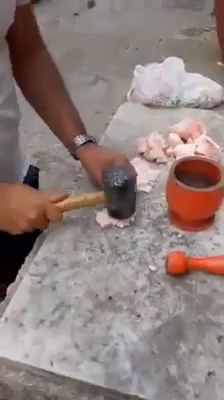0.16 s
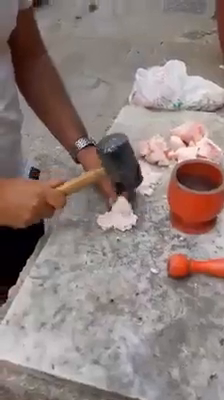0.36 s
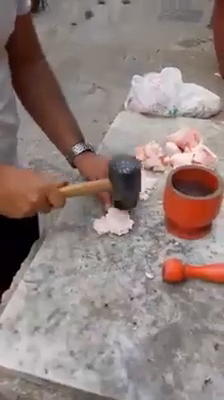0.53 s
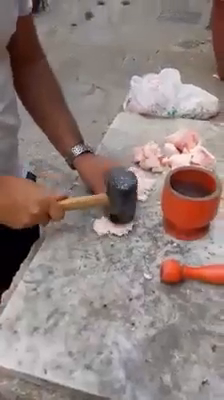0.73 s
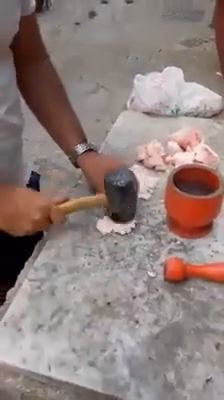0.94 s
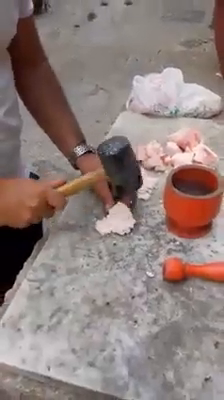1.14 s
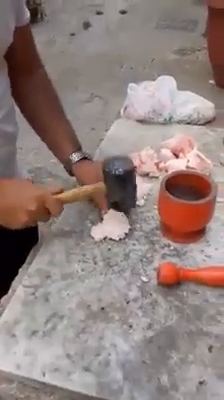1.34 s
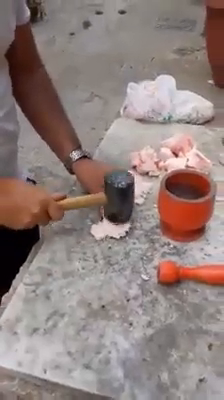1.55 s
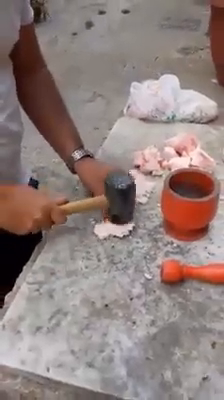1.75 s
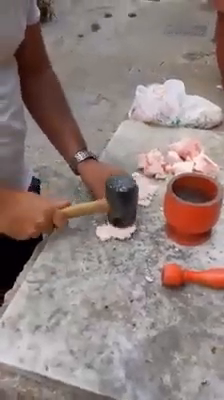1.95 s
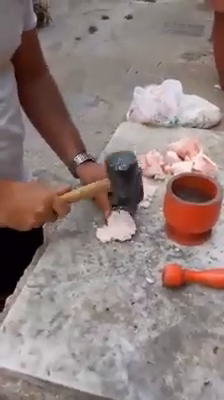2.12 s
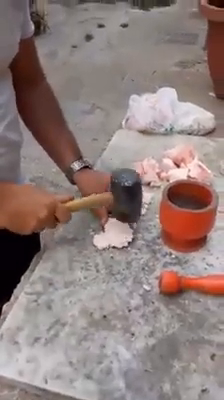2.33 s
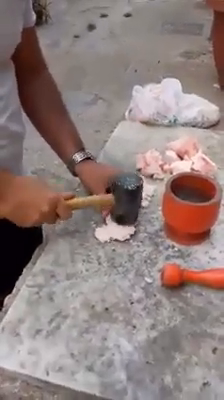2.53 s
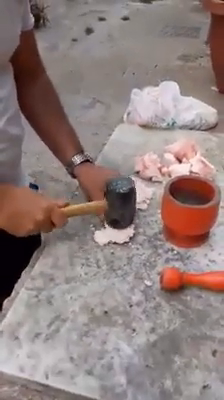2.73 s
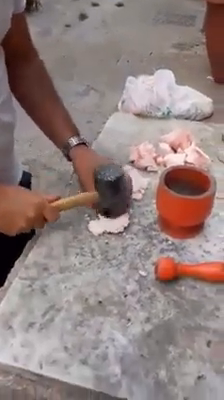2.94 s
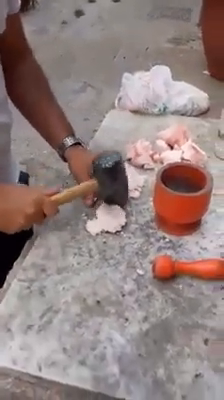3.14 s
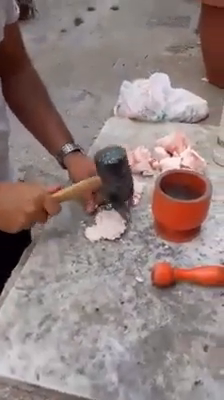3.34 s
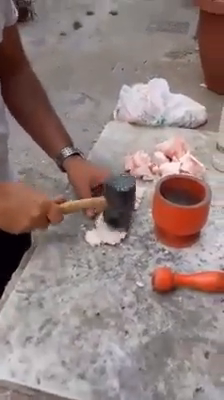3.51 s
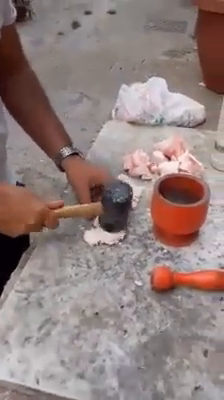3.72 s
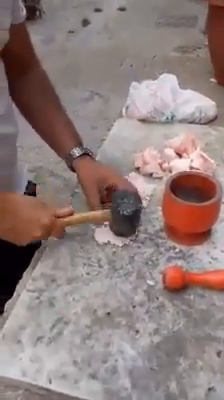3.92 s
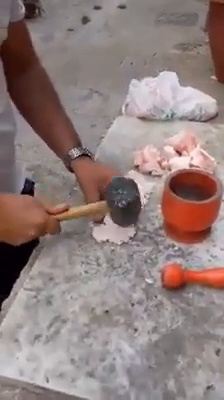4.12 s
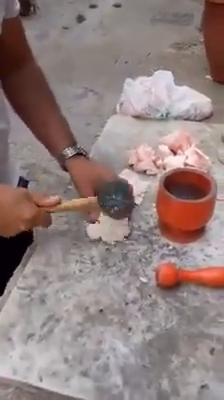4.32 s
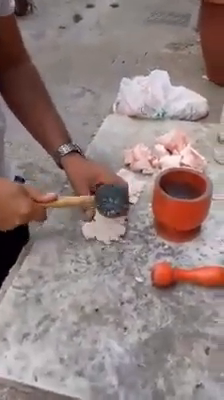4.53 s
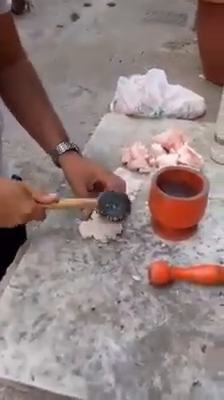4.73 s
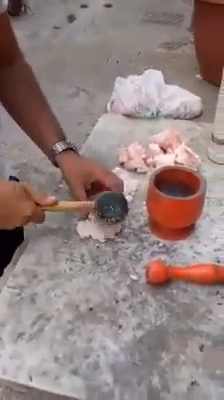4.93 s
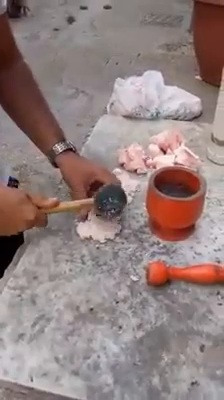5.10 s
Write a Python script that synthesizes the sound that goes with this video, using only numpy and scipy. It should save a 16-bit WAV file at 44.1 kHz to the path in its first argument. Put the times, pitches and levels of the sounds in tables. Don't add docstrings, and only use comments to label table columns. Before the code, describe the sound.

Close outdoor take of a rubber mallet striking frozen fat on a stone slab, roughly four even blows a second. Each has a short brittle crack, a hollow low-mid thud and a softer double bounce with a wet slap. Blows get heavier towards the middle, then suddenly weaken after four seconds to light taps. Crumbs hiss and tick between; a short dark yard echo follows, over very quiet air.

```python
import sys
import numpy as np
from scipy import signal
from scipy.fft import rfft, irfft
from scipy.io import wavfile
from scipy.ndimage import uniform_filter1d

SR = 44100
rng = np.random.default_rng(int(sys.argv[2]) if len(sys.argv) > 2 else 0)


def unload_wav(signal):
    wavfile.write(
        sys.argv[1],
        SR,
        np.round(np.clip(np.atleast_2d(signal).T, -1, 1) * 32767).astype(np.int16),
    )


def rack_gain(trim_db):
    fader = np.asarray(trim_db, float)
    return 10 ** (fader / 20)


N = 232318

# start_s, peak_db, tilt_db_per_octave, length_s, settling_hiss_db
SHATTERS = [(0.2545, -19, 0.1, 0.0052, -57), (0.519, -16.5, 0.5, 0.0061, -55.5),
            (0.7824, -18.5, 2, 0.0081, -55.5), (1.044, -12.5, -3, 0.0074, -51),
            (1.3075, -11, -4, 0.0066, -52), (1.5694, -16, 2, 0.0065, -56),
            (1.8135, -14, -1.5, 0.0077, -54.5), (2.065, -9.5, -0.3, 0.0064, -50),
            (2.3141, -13, -4, 0.0081, -50.5), (2.5553, -17, -4.5, 0.0094, -52.5),
            (2.7923, -15, -5, 0.0074, -54.5), (3.025, -19, -2.5, 0.0067, -55),
            (3.277, -11.5, 1.5, 0.0086, -50.5), (3.522, -17.5, -4, 0.0087, -55.5),
            (3.757, -19.5, -1.5, 0.011, -54), (4.015, -22, -2.5, 0.011, -56),
            (4.259, -23, -1.6, 0.0094, -57.5), (4.503, -25, -5.5, 0.0094, -65.5),
            (4.736, -24, -3.5, 0.0077, -64.5), (4.9752, -19, 1.5, 0.0058, -62.5),
            (5.214, -12.5, 4.5, 0.0085, -56.5)]
# pitch_hz, level_db_per_hz
BRITTLE = [(900, -40), (2100, -3), (3200, -14), (4400, -3.5), (5000, -8.5), (6750, -10), (8300, -2.5),
           (9700, -4), (10600, -16.5), (11300, -14), (12000, -4), (14000, -15), (15600, -29),
           (16200, -72.5)]


def evened(x):
    return x / np.sqrt(np.mean(x ** 2) + 1e-20)


def read(points, hz):
    f, value = np.transpose(points)
    return np.interp(np.log(hz + 1), np.log(f + 1), value)


def add(mix, s, sound):
    part = mix[round(s * SR):][:len(sound)]
    part += sound[:len(part)]


def coloured(x, spectrum):
    gain = rack_gain(read(spectrum, np.fft.rfftfreq(len(x), 1 / SR)))
    return evened(irfft(rfft(x) * gain, len(x)))


def still_air():
    # pitch_hz, level_db_per_hz
    air_colour = [(15, -28), (25, -9.5), (34, 1), (64, -15.5), (195, -1), (255, -9), (465, 1), (620, -8),
                  (1400, -13), (2050, -14), (2410, -21.5), (3520, -25.5), (5280, -34.5), (10700, -28),
                  (12500, -25.5), (14400, -30.5), (16000, -50)]
    now = np.arange(N) / SR
    swell_db = np.interp(now, [.05, .2, .4, 4.6, 5.1], [-5.0, -1.5, 3.0, 6.5, -4.0])
    return rack_gain(-62.5 + swell_db) * coloured(rng.standard_normal(N), air_colour)


def crumbs():
    # start_s, peak_db
    ticks = [
        (0.2109, -66),
        (0.3387, -49.5),
        (1.8836, -59),
        (1.9294, -54),
        (1.993, -50),
        (2.2333, -58),
        (2.4892, -53),
        (2.52, -44.5),
        (3.673, -52),
        (3.73, -63),
    ]
    # pitch_hz, level_db_per_hz
    grit_colour = [(2000, -20), (2800, -2), (3700, -1), (4100, 1.5), (4500, -14.5), (7700, -11.5),
                   (8300, -7.5), (9800, -7.5), (10400, -23.5), (11300, -29.5), (11700, -8.5), (13000, -15),
                   (15400, -35), (15800, -62)]
    # middle_s, length_s, level_db
    strokes = [(0.93, 0.14, -68.5), (1.222, 0.29, -84), (1.79, 0.044, -78), (1.982, 0.11, -58),
               (2.25, .06, -68), (2.52, 0.093, -62.5), (3.208, 0.059, -70), (3.672, 0.22, -64),
               (3.964, 0.072, -70), (4.19, 0.21, -63.5), (4.484, 0.075, -58.5), (4.547, 0.084, -53),
               (5.168, 0.069, -74.5)]
    # pitch_hz, level_db_per_hz
    rub_colour = [(2000, -18.5), (3500, -6.5), (4800, -6.5), (6800, -15.5), (8800, -7), (10700, -16),
                  (12200, -9), (15600, -31)]
    wait_s, fade_db_per_s = .028, 98

    now, rub_power = np.arange(N) / SR, np.zeros(N)
    starts, settle_db = np.array(SHATTERS)[:, [0, 4]].T
    last = np.searchsorted(starts, now) - 1
    since = now - starts[last] - wait_s
    settling = (last >= 0) * (since > 0) * rack_gain(settle_db[last] - fade_db_per_s * since)
    for middle, length, db in strokes:
        rub_power += rack_gain(db) ** 2 * np.exp(-abs(2 * (now - middle) / length) ** 3.0)

    grains = rack_gain(2.7 * rng.exponential(1, (2, N))) * rng.standard_normal((2, N))
    out = uniform_filter1d(settling, size=900) * coloured(grains[0], grit_colour)
    out += np.sqrt(rub_power) * coloured(grains[1], rub_colour)
    t = np.arange(1024) / SR
    for s, db in ticks:
        tick = coloured(rng.standard_normal(1024), BRITTLE) * np.exp(-t / 0.0044)
        add(out, s, rack_gain(db - 1.0) * tick)
    return out


def yard():
    # delay_s, level_db
    echo_taps = [
        (.006, -18),
        (.011, -20.5),
        (.018, -19),
    ]
    # pitch_hz, t60_s
    decay = [(100, 0.47), (230, 0.36), (330, 0.52), (500, 0.33), (1000, 0.46), (2000, 0.36), (4000, 1),
             (9000, 1)]
    wall_hz, tail_db, tail_start_s = 2220, -6, .012

    taps, near = np.zeros(SR), np.zeros(SR)
    at = np.arange(0, SR - 20, 20) + rng.integers(0, 20, SR // 20 - 1)
    taps[at] = rng.choice([-1., 1.], at.shape)
    hz, t, z = signal.stft(taps, SR, nperseg=256)
    fading = z * rack_gain(-60 * t / read(decay, hz)[:, None])
    tail = signal.istft(fading, SR, nperseg=256)[1][:SR]
    add(near, tail_start_s, rack_gain(tail_db) * tail / np.linalg.norm(tail))
    for delay, db in echo_taps:
        add(near, delay, rack_gain(db) * np.ones(1))
    return signal.lfilter(*signal.butter(3, wall_hz, fs=SR), near)


def crunch(db, tilt_db, length):
    t = np.arange(2048) / SR
    rise = np.minimum(t / 0.005, 1) ** 1.58
    crush = rise * (np.exp(-(t / length) ** 3.0) + 0.14 * np.exp(-t / 0.011))
    colour = [(hz, level + tilt_db * np.log2(hz / 7000)) for hz, level in BRITTLE]
    return rack_gain(db - 8.0) * crush * coloured(rng.standard_normal(2048), colour)


def slap(db):
    # pitch_hz, level_db_per_hz
    slap_colour = [(700, -31.5), (1300, -5), (2000, 0.5), (2600, -6.5), (3000, -24.5), (3700, -12.5),
                   (4200, -44.5), (8000, -45.5)]
    rise_s, fall_s = 0.0017, 0.024
    t = np.arange(4096) / SR
    squeeze = (1 - np.exp(-t / rise_s)) * np.exp(-(t / fall_s) ** 1.9)
    return rack_gain(db - 14.5) * squeeze * coloured(rng.standard_normal(4096), slap_colour)


def ring(modes, push, shift_db, rise, scale=1):
    t = np.arange(6000) / SR
    body = np.zeros(6000)
    for (hz, db, t60), shift in zip(modes, shift_db):
        body += rack_gain(db + shift - 60 * t / t60) * np.sin(2 * np.pi * hz * scale * t)
    out = signal.fftconvolve(body * (1 - np.exp(-t / rise)), push)
    return out / abs(out).max()


def slips(give):
    t = np.arange(1800) / SR
    jerks, stroke = rng.standard_normal(1800), t / give * np.exp(-t / give)
    for _ in range(4):
        z = rfft(jerks * stroke)
        flat = irfft(z / (abs(z) + 1e-12))
        jerks = np.clip(evened(flat / (stroke + .05)), -3, 3)
    return jerks * stroke


def landing(thud_db, boom_db, knock_db, thud_hz, tilt_db, give):
    # pitch_factor, level_db, t60_s
    thud_modes = [
        (.69, -12, 0.05),
        (.83, -14, 0.073),
        (1.001, 3, 0.062),
        (1.17, -16, 0.2),
    ]
    # pitch_hz, level_db, t60_s
    boom_modes = [
        (78, -13, 0.28),
        (133, -7.5, 0.31),
        (167, 2, .07),
        (193.6, 15.5, 0.069),
        (246.3, 6, 0.15),
    ]
    # pitch_hz, level_db, t60_s
    knock_modes = [(693, -0.5, 0.075), (847.3, 12, 0.019), (1023, 2, 0.012), (985, 13.5, 0.018),
                   (1208.5, 14, 0.017), (1438, 7, 0.024), (1669, 4, 0.023), (1776, -5.5, 0.012),
                   (1874, 10, 0.011), (2167, -2.5, 0.022), (2150, -25, 0.0085), (2790, -21.5, 0.0054),
                   (3930, -30.5, 0.0087)]

    shift_db = 1.34 * rng.standard_normal((3, len(knock_modes)))
    t = np.arange(1800) / SR
    soft = np.exp(-((t - .001) / 0.00065) ** 2)
    body = rack_gain(thud_db + 2.3) * ring(thud_modes, soft, shift_db[0], 0.014, thud_hz)
    body += rack_gain(boom_db + 3.0) * ring(boom_modes, soft, shift_db[1], 0.013)
    spot = 1 + 0.031 * shift_db[1, -1]
    bright_db = shift_db[2] + tilt_db * np.log2(np.array(knock_modes)[:, 0] / 1200)
    return body + rack_gain(knock_db + 6.5) * ring(knock_modes, slips(give), bright_db, 0.00099, spot)


def mallet():
    # start_s, thud_db, boom_db, knock_db, knock_tilt_db_per_octave
    blows = [(0.255, -17.5, -27.5, -19, -1.5), (0.517, -21, -25.5, -20.5, 12.5),
             (0.784, -10.5, -21, -17.5, 1.5), (1.044, -10.5, -22, -15, -2.5), (1.308, -14, -23.5, -20, -1),
             (1.57, -15.5, -23, -18, 6), (1.815, -15.5, -23, -15.5, 4.5), (2.064, -9.5, -21, -11.5, 8),
             (2.315, -9, -23, -11, 5.5), (2.562, -5.5, -22.5, -12.5, -4), (2.798, -6, -24, -12.5, -7.5),
             (3.03, -5.5, -23.5, -12, -0.5), (3.277, -4, -21.5, -10, 4.5), (3.523, -5.5, -21.5, -13, -1),
             (3.761, -6.5, -21, -15.5, 2.5), (4.017, -16, -24, -18, 6), (4.262, -17.5, -31, -29.5, -3),
             (4.507, -19, -30.5, -32.5, -9), (4.736, -30, -35.5, -39, 5), (4.974, -28, -46, -29, 10),
             (5.214, -25, -38, -27.5, 4)]
    # rebound_s, press_db, rebound_thud_db, rebound_knock_db, last_hop_db
    rebounds = [(0.28, -15.5, -20, -31.5, -20.5), (0.551, -13, -19, -46, -27), (0.815, -6, -12, -16, -10),
                (1.075, -12.5, -18, -25, -38), (1.333, -13.5, -25, -25.5, -26),
                (1.604, -13, -17, -23.5, -33), (1.845, -10.5, -12.5, -20.5, -26),
                (2.097, -7, -4.5, -11.5, -12), (2.341, -9.5, -9, -13.5, -8),
                (2.588, -11.5, -9.5, -15.5, -15), (2.826, -10, -15, -20.5, -43), (3.055, -7, -22, -12, -19),
                (3.305, -19, -9, -11, -9), (3.552, -6, -11, -10, -12), (3.788, -5, -15, -12, -14),
                (4.041, -16.5, -11, -21, -28.5), (4.305, -17.5, -21, -54, -42.5),
                (4.551, -19, -24.5, -48, -46), (4.78, -39, -38, -64.5, -61), (5.012, -41, -56, -59, -54.5),
                (5.252, -44, -38, -62, -55)]
    thud_hz, rebound_hz, spot_hz = 457.1, 466.5, 6.2
    boom_follows = 0.25

    body = np.zeros(N)
    for (s, thud, boom, knock, tilt), (again, press, thud2, knock2, hop) in zip(blows, rebounds):
        spot = spot_hz * rng.standard_normal(4)
        add(body, s - .002, landing(thud, boom, knock, thud_hz + spot[0], tilt, give=0.0022))
        rebound_boom = boom - 0.5 + boom_follows * (thud2 - thud)
        hop_boom = boom - 13.5 + boom_follows * (hop - thud)
        hop_s = again + .55 * (again - s)
        later = [(s + .012, press, boom - 6, press - 8.5, -9.5),
                 (again, thud2, rebound_boom, knock2, 1.2),
                 (hop_s, hop, hop_boom, hop - 13.5, -4.5)]
        for (at, *levels, slope), shift in zip(later, spot[1:]):
            contact = landing(*levels, rebound_hz + shift, slope, give=0.0068)
            add(body, at - .002, rack_gain(-2.0) * contact)
        add(body, again - .004, slap(knock2))
    return body


def scene():
    body, cracks = mallet(), np.zeros(N)
    for s, *strength, _ in SHATTERS:
        add(cracks, s - .002, crunch(*strength))

    turn = np.arange(N) / SR * 2 * np.pi / 1.5
    echoes = np.zeros(N)
    for k in range(3):
        share = np.sqrt(2 / 3) * np.cos(turn + k * np.pi / 3)
        echoes += signal.fftconvolve(share * (body + rack_gain(1.0) * cracks), yard())[:N]

    no_rumble = signal.butter(2, 120, "high", fs=SR, output="sos")
    thin = signal.sosfilt(no_rumble, body + echoes)
    return (rack_gain(-2.0) * thin + cracks + crumbs() + still_air())[None]


def masked(x):
    # pitch_hz, db_under_loudest
    mask_floor = [(3950, -70), (4250, -44.5), (4550, -78.5), (8050, -62), (8400, -78), (13600, -76),
                  (14000, -60.5), (15600, -68)]
    # pitch_hz, db_against_neighbours
    starve_floor = [(1500, -14), (2400, -3), (3300, 0), (4300, 3), (4700, -7), (7900, -3), (8600, -12),
                    (15000, -7)]
    fade = .6

    hz, _, z = signal.stft(x, SR, window="cosine", nperseg=1536, noverlap=768)
    size = abs(z) + 1e-12
    top = size.max(axis=1, keepdims=True)
    held_top = signal.lfilter([1 - fade], [1, -fade], top)
    mask_limit = held_top * rack_gain(read(mask_floor, hz))[:, None]

    bands = np.repeat(rng.standard_normal((z.shape[2], 129)), 6, axis=1).T[:len(hz)]
    starve_db = read(starve_floor, hz)[:, None] + 3.5 * bands + 0.07 * (20 * np.log10(top) + 32.5)
    starve_limit = uniform_filter1d(size, size=25, axis=1) * rack_gain(starve_db)

    limit = np.maximum(mask_limit, starve_limit)
    treble = size[:, hz > 5000].sum(axis=1, keepdims=True)
    steady = treble < 3 * np.roll(treble, 2, axis=2)
    kept = z / (1 + steady * (limit / size) ** 6)
    return signal.istft(kept, SR, window="cosine", nperseg=1536, noverlap=768)[1][:, :N]


def band_limit(x):
    return signal.sosfilt(signal.butter(12, 16620, fs=SR, output="sos"), x)


def record(dry):
    opens_s, fade_s = 0.027, 0.018
    opened = dry * np.clip((np.arange(N) / SR - opens_s) / fade_s, 0, 1)
    rounded = 1.6 * np.tanh(opened / 1.6)
    limited = signal.sosfilt(signal.butter(10, 15500, fs=SR, output="sos"), rounded)
    return band_limit(masked(limited))


dry = scene()
out = record(dry)
unload_wav(out)
```